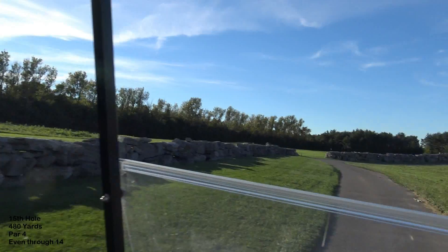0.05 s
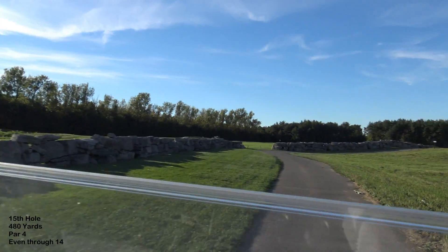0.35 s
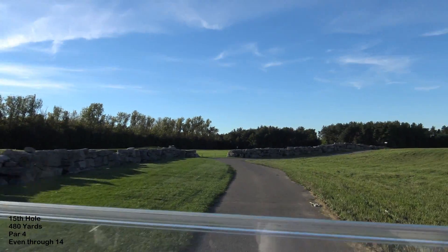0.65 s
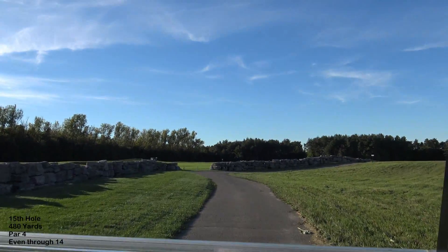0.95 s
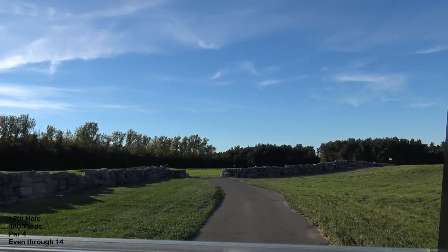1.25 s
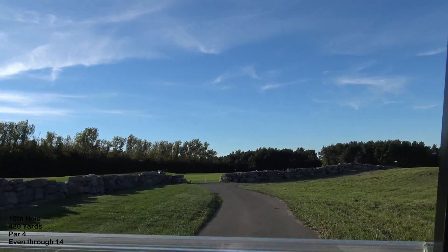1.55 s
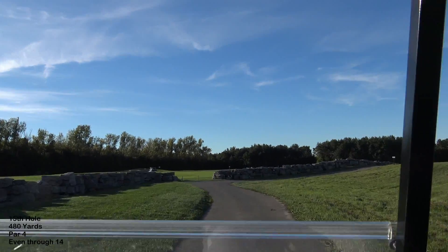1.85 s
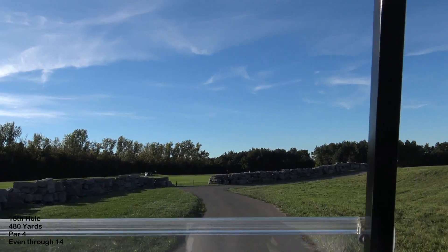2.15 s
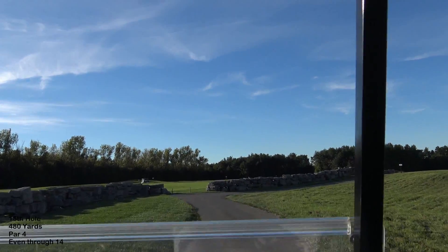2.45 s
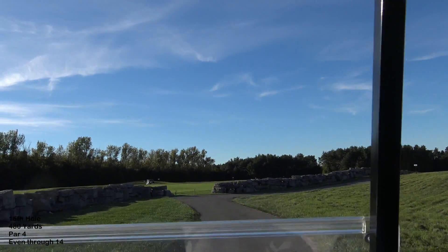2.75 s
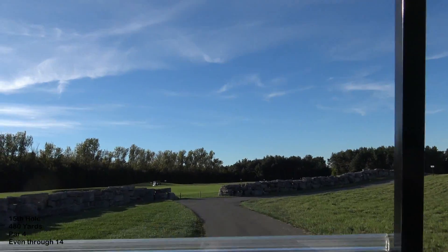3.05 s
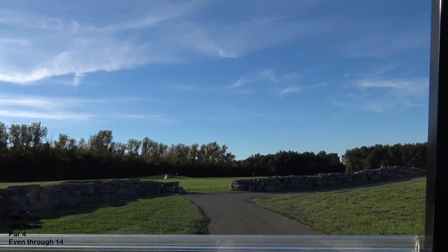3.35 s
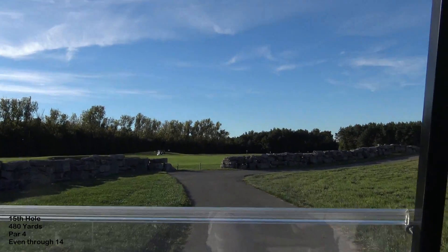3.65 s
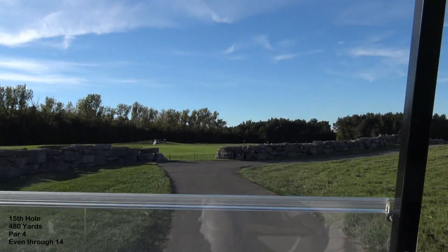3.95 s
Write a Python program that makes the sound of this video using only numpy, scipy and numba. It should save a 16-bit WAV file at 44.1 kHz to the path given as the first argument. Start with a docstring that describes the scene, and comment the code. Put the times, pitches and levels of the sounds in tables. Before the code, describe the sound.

A golf cart rides over a paved path outdoors, with low thumps and gusts on the onboard microphone. Plastic knocks, windscreen clacks and metallic rattles build halfway through, then ease into soft tyre noise and a faint whine.

```python
"""A golf cart rolls along a paved path, heard from the seat. Bumps thump the chassis, knock the hollow
plastic body, clack the windscreen and shake loose metal, most on a rough stretch halfway. Blows ring
damped modes; rattles are flurries of tiny contacts. Wind buffets the microphone over the tyre noise,
and a faint whine comes up near the end. A limiter holds the peaks down."""
import sys
import numpy as np
from scipy import signal
from scipy.fft import rfft, irfft, next_fast_len
from scipy.io import wavfile
from scipy.ndimage import uniform_filter1d, minimum_filter1d
from numba import njit

SR = 44100
rng = np.random.default_rng(int(sys.argv[2]) if len(sys.argv) > 2 else 0)


def wav_record(signal):
    """Record a signal, one row per channel, as 16-bit PCM in the file named by sys.argv[1]."""
    frames = np.transpose(np.atleast_2d(signal))
    bounded = np.clip(frames, -1, 1)
    # unit amplitude maps onto the largest positive 16-bit level
    quanta = np.round(bounded * 32767).astype(np.int16)
    wavfile.write(sys.argv[1], SR, quanta)


N = 176400

# Table levels are relative; each source applies its own gain.
# chatter of small parts: time_s, level_db
CHATTER_LEVELS = [(0.0, -54.5), (1.07, -51), (2.03, -46.5), (2.53, -38), (3.14, -53.5), (4.0, -55.5)]
# tyre noise: time_s, level_db
TYRE_LEVELS = [(0.0, -44.5), (0.29, -42), (0.53, -46), (2.48, -40.5), (3.2, -45.5), (4.0, -44.5)]
# wind gusts: time_s, rumble_db, flutter_db
WIND_LEVELS = [(0.0, -10.5, -19), (0.1, -23, -55), (0.21, -26.5, -38), (0.28, -14.5, -26),
               (0.47, -20.5, -23.5), (0.53, -23, -31), (1.07, -23.5, -27.5), (1.11, -33, -39.5),
               (1.26, -25, -29.5), (1.36, -32.5, -40.5), (1.6, -23.5, -26), (1.63, -32, -36),
               (2.31, -24, -25), (2.64, -33, -32.5), (2.99, -21.5, -34), (3.24, -34.5, -41),
               (3.35, -26.5, -31.5), (4.0, -33.5, -43)]

# slow pushes of air: start_s, peak_db
AIR_PUSHES = [(0.054, -2.5), (0.403, -7), (0.602, -5)]
# rattles of loose fittings: start_s, level_db, treble_db
FITTING_RATTLES = [(0.361, -38.5, -11), (0.393, -39, -12), (0.5476, -37, -14), (0.774, -35, -14),
                   (1.312, -36.5, -23), (1.3753, -40, -3), (1.408, -50.5, 3.5), (1.468, -37, -8.5),
                   (1.643, -49.5, 1), (1.784, -42, -5), (1.978, -41.5, -7), (2.0838, -32, -11),
                   (2.1844, -36, -9.5), (2.2784, -33, -8.5), (2.386, -33.5, -5.5), (2.4304, -30.5, -11.5),
                   (2.484, -31, -9), (2.5687, -39, -0.5), (2.5886, -44, -1), (2.6815, -36.5, -7.5),
                   (2.728, -34.5, -5.5), (2.786, -41, 0), (2.8235, -35, -8), (2.885, -29, -15.5),
                   (3.1666, -38, -6)]
# clinks of one metal piece: start_s, level_db
METAL_HITS = [(0.1111, -43), (0.2382, -40.5), (0.8001, -46.5), (1.1513, -43.5), (1.482, -42.5),
              (1.7076, -40.5), (1.798, -44.5), (2.0017, -40.5), (2.257, -40), (2.345, -38.5),
              (2.5534, -39.5), (2.646, -42), (2.822, -39.5), (3.3163, -47.5), (3.672, -49)]
# windscreen clacks: start_s, level_db
SCREEN_HITS = [(0.0279, -28.5), (0.953, -28), (1.2491, -31), (1.2977, -36), (1.42, -28.5), (1.5392, -25.5),
               (1.7365, -21.5), (1.9023, -25.5), (2.2009, -18.5), (2.3016, -24), (2.3706, -21.5),
               (2.431, -23), (2.4991, -27), (2.612, -25), (2.6866, -25)]
# body knocks: start_s, level_db, pitch_hz
BODY_HITS = [(1.056, -27.5, 720), (1.146, -23, 660), (1.842, -27.5, 640), (1.886, -25.5, 760),
             (1.907, -15.5, 660), (2.012, -28, 650), (2.458, -20, 650), (2.663, -16.5, 680),
             (2.712, -27, 580), (2.915, -23, 630), (2.927, -23.5, 600)]
# chassis thumps: start_s, level_db
CHASSIS_HITS = [(0.331, -1.5), (0.454, -8), (0.68, -2.5), (1.005, -3), (2.001, -3.5), (2.094, -4),
                (2.209, -1), (2.312, -5), (2.8, -4.5), (3.049, -14)]

# modes of the struck parts: freq_hz, level_db, t60_s
METAL_RESONANCES = [(3250, -12, .025), (4150, -6, .02), (4570, -3, .025), (4970, 3.5, 0.034),
                    (5170, 3, 0.036), (8450, -8, .03)]
SCREEN_RESONANCES = [(171, -19, 0.013), (313, 3, 0.07), (506, 2.5, 0.019), (726, -37, 0.14),
                     (1152, -2, 0.015), (1365, -8.5, 0.043)]
BODY_RESONANCES = [(290, -12, .06), (480, -9, .05), (590, -4.5, .055), (660, 0, .06), (755, -6, .045),
                   (965, -14, .035)]
CHASSIS_RESONANCES = [(59.6, 2, 0.12), (82.4, 4.5, 0.12), (139.6, 12, 0.023)]

# noise spectra: freq_hz, density_db
TYRE_SPECTRUM = [(100, -0.5), (170, 5), (300, -5.5), (440, -2.5), (640, 2), (850, -5), (1250, -8.5),
                 (1900, -17.5), (3000, -23), (4800, -35.5), (8200, -30.5), (12500, -49.5)]
RUMBLE_SPECTRUM = [(12, -4.5), (28, 1), (60, 1.5), (110, 1.5), (160, -3), (260, -15.5), (3000, -78.5)]
FLUTTER_SPECTRUM = [(70, -21), (165, 0), (240, -1.5), (330, -9), (480, -17), (1000, -36), (8000, -59),
                    (12000, -70.5)]
RATTLE_SPECTRUM = [(500, -21), (1500, 0.5), (3000, 9.5), (4500, 6.5), (6500, 3), (8500, -4.5), (10500, -10),
                   (13000, -23)]
CRACK_SPECTRUM = [(200, 1.5), (700, 18.5), (1300, -6), (2000, -2), (3500, -8), (8000, -13.5), (12500, -29)]


def undb(db):
    """Decibels to gain."""
    return 10 ** (np.asarray(db) / 20)


def unit_rms(x):
    """Scale to rms 1."""
    return x / np.sqrt(np.mean(x ** 2) + 1e-18)


def gain_curve(points):
    """Gain over time from (time_s, level_db) points."""
    return undb(np.interp(np.arange(N) / SR, *np.array(points).T))


def colour(x, spectrum):
    """Minimum-phase filter of unit power gain, shaped by (freq_hz, density_db) points."""
    hz, db = np.array(spectrum, float).T
    size = next_fast_len(2 * N)
    log_hz = np.log(np.fft.rfftfreq(size, 1 / SR) + 1)
    log_gain = np.log(undb(np.interp(log_hz, np.log(hz), db)))
    cepstrum = irfft(log_gain, size)
    cepstrum[1:size // 2] *= 2
    cepstrum[size // 2 + 1:] = 0
    response = np.exp(rfft(cepstrum))
    response /= np.sqrt(np.mean(abs(response) ** 2))
    return irfft(rfft(x, size) * response, size)[:N]


def wander(rate_hz):
    """Smooth random drift, rms 1."""
    hold = max(int(SR / rate_hz), 2)
    steps = np.repeat(rng.standard_normal(N)[:N // hold + 1], hold)
    return unit_rms(uniform_filter1d(uniform_filter1d(steps, hold), hold)[:N])


def decay(t60_s):
    """Exponential decay, 0.3 s long."""
    return np.exp(-np.log(1000) * np.arange(13230) / SR / t60_s)


def add(out, start_s, x):
    """Mix x in at start_s."""
    i = int(np.clip(start_s * SR, 0, N - 1))
    out[i:i + len(x)] += x[:N - i]


def contacts(per_s, scatter_db):
    """Random tiny impacts of uneven size."""
    impulses = (rng.random(N) < per_s / SR) * rng.choice([-1, 1], N)
    sizes = undb(scatter_db * np.clip(rng.standard_normal(N), -2, 2))
    return unit_rms(impulses * sizes)


def flurries(hits, t60_s, rise_s=0.00069):
    """A dying flurry of tiny contacts and noise at each hit."""
    envelope = np.zeros(N)
    shape = decay(t60_s) * (1 - decay(rise_s * np.log(1000)))
    for start_s, level_db in hits:
        add(envelope, start_s, undb(level_db) * shape)
    return envelope * unit_rms(contacts(per_s=2200, scatter_db=2.5) + .6 * rng.standard_normal(N))


def ring(hits, modes, rise_s, detune, scatter_db=2):
    """Each blow rings the modes a little differently; a soft contact builds up over rise_s."""
    out = np.zeros(N)
    t = np.arange(len(decay(1))) / SR
    attack = 1 - np.exp(-t / rise_s)
    for start_s, level_db in hits:
        for k, (hz, mode_db, t60_s) in enumerate(modes):
            pitch_draw, level_draw = rng.standard_normal(2)
            gain = (-1) ** k * undb(level_db + mode_db + scatter_db * level_draw)
            tone = np.sin(2 * np.pi * hz * (1 + detune * pitch_draw) * t)
            add(out, start_s, gain * attack * decay(t60_s) * tone)
    return out


def resonate(x, modes, width_hz):
    """Parallel resonances of one width, about unit power gain in all."""
    bands = sum(undb(db) * signal.lfilter(*signal.iirpeak(hz, hz / width_hz, fs=SR), x)
                for hz, db, *_ in modes)
    power = sum(undb(db) ** 2 for _, db, *_ in modes)
    return bands * np.sqrt(SR / np.pi / width_hz / power)


def whine(pitch_hz=963, gain_db=-51, start_s=3.15, rise_s=0.61):
    """A faint wavering whine, probably of the drive, fades in."""
    rise = np.clip((np.arange(N) / SR - start_s) / rise_s, 0, 1)
    flicker = undb(4.5 * wander(rate_hz=12))
    freq_hz = pitch_hz * (1 + .014 * wander(rate_hz=70))
    return undb(gain_db) * rise * flicker * np.sin(2 * np.pi * np.cumsum(freq_hz) / SR)


def chatter(gain_db=-8.5):
    """Small parts tick all the time, more where the path is rough."""
    ticks = contacts(per_s=380, scatter_db=4)
    power = signal.fftconvolve(ticks ** 2, decay(t60_s=.028) ** 2)[:N]
    grains = np.sqrt(abs(power)) * rng.standard_normal(N)
    return undb(gain_db) * gain_curve(CHATTER_LEVELS) * unit_rms(colour(grains, RATTLE_SPECTRUM))


def tyres(gain_db=5, flicker_db=1.18):
    """Tyres drum over the grain of the path."""
    grain = contacts(per_s=900, scatter_db=2.2) + 1.69 * rng.standard_normal(N)
    grain *= undb(flicker_db * wander(rate_hz=35.61))
    return undb(gain_db) * gain_curve(TYRE_LEVELS) * unit_rms(colour(grain, TYRE_SPECTRUM))


def buffets(length_s=0.0433):
    """Slow pushes of air on the microphone, too low to hear but strong enough to work the limiter."""
    out = np.zeros(N)
    push = np.hanning(int(length_s * SR))
    for start_s, peak_db in AIR_PUSHES:
        add(out, start_s, undb(peak_db) * push)
    return out


def wind(rumble_gain_db=2.5, flutter_gain_db=-2, flicker_db=2):
    """Large eddies rumble on the microphone in gusts; smaller ones flutter above them."""
    large, small = rng.standard_normal((2, N)) * undb(flicker_db * wander(rate_hz=40))
    rumble = unit_rms(colour(large, RUMBLE_SPECTRUM))
    rumble *= gain_curve([(time_s, db) for time_s, db, _ in WIND_LEVELS])
    flutter = unit_rms(colour(small, FLUTTER_SPECTRUM))
    flutter *= gain_curve([(time_s, db) for time_s, _, db in WIND_LEVELS])
    return undb(rumble_gain_db) * rumble + undb(flutter_gain_db) * flutter


def fitting(start_s, level_db, range_hz=(4000, 10000), ring_db=-7):
    """One loose fitting buzzes: bare contacts plus seven resonances of its own."""
    flurry = flurries([(start_s, level_db)], t60_s=.07)
    modes = [(hz, 0) for hz in rng.uniform(*range_hz, size=7)]
    return flurry + undb(ring_db) * resonate(flurry, modes, width_hz=220)


def fitting_rattles(gain_db=-4.5, split_hz=6500, treble_boost_db=15.5):
    """Loose fittings buzz briefly after each jolt, some brighter than others."""
    low_feed = high_feed = 0
    for start_s, level_db, treble_db in FITTING_RATTLES:
        buzz = fitting(start_s, level_db)
        low_feed = low_feed + buzz
        high_feed = high_feed + undb(treble_db + treble_boost_db) * buzz
    low = signal.sosfilt(signal.butter(2, split_hz, "low", fs=SR, output="sos"), low_feed)
    high = signal.sosfilt(signal.butter(2, split_hz, "high", fs=SR, output="sos"), high_feed)
    return undb(gain_db) * colour(low + high, RATTLE_SPECTRUM)


def metal_clinks(ring_db=-4, buzz_db=-2.5):
    """A struck metal piece chatters briefly on its seat, which damps and widens its resonances."""
    metal = ring(METAL_HITS, METAL_RESONANCES, rise_s=0.00076, detune=0.022)
    buzz = resonate(flurries(METAL_HITS, t60_s=0.071), METAL_RESONANCES, width_hz=660)
    return undb(ring_db) * metal + undb(buzz_db) * buzz


def windscreen_clacks(ring_db=-3.5, crack_db=-2):
    """The windscreen slaps its frame: a crack and a short ring."""
    screen = ring(SCREEN_HITS, SCREEN_RESONANCES, rise_s=0.00018, detune=0.039)
    crack = colour(flurries(SCREEN_HITS, t60_s=0.055), CRACK_SPECTRUM)
    return undb(ring_db) * screen + undb(crack_db) * crack


def body_knocks(ring_db=.5, crack_db=-10):
    """Loose load strikes the hollow plastic body; the pitch depends on where it lands."""
    strongest_hz = max(BODY_RESONANCES, key=lambda mode: mode[1])[0]
    body = np.zeros(N)
    for start_s, level_db, pitch_hz in BODY_HITS:
        modes = [(hz * pitch_hz / strongest_hz, db, t60_s) for hz, db, t60_s in BODY_RESONANCES]
        body += ring([(start_s, level_db)], modes, rise_s=.0018, detune=.025, scatter_db=1)
    hits = [(start_s, level_db) for start_s, level_db, _ in BODY_HITS]
    crack = colour(flurries(hits, t60_s=.075), CRACK_SPECTRUM)
    return undb(ring_db) * body + undb(crack_db) * crack


def chassis_thumps(gain_db=-10):
    """Bumps ring the low modes of the chassis."""
    return undb(gain_db) * ring(CHASSIS_HITS, CHASSIS_RESONANCES, rise_s=0.0017, detune=0.048)


def scene():
    """Mono mix at the seat."""
    low_layers = chassis_thumps() + wind() + buffets() + tyres()
    panels = body_knocks() + windscreen_clacks()
    loose_parts = metal_clinks() + fitting_rattles() + chatter()
    return (low_layers + panels + loose_parts + whine())[None]


@njit
def peak_hold(x, release_s):
    """Peak follower: instant attack, exponential release."""
    retain = np.exp(-1 / (release_s * SR))
    out, peak = np.empty(len(x)), 0.
    for i in range(len(x)):
        peak = max(abs(x[i]), peak * retain)
        out[i] = peak
    return out


def record(dry, threshold_db=-11.6, low_cut_hz=20, high_cut_hz=12700):
    """A look-ahead limiter ducks the mix under the strongest peaks; deepest bass and top are cut."""
    peaks = peak_hold(dry[0], release_s=0.0087)
    gain = np.minimum(1, undb(threshold_db) / (peaks + 1e-9))
    gain = uniform_filter1d(minimum_filter1d(gain, size=260), size=260)  # look-ahead ramp
    highpass = signal.butter(1, low_cut_hz, "high", fs=SR, output="sos")
    lowpass = signal.ellip(8, .2, 70, high_cut_hz, fs=SR, output="sos")
    return signal.sosfilt(lowpass, signal.sosfilt(highpass, dry * gain))


dry = scene()
out = record(dry)
wav_record(out)
```